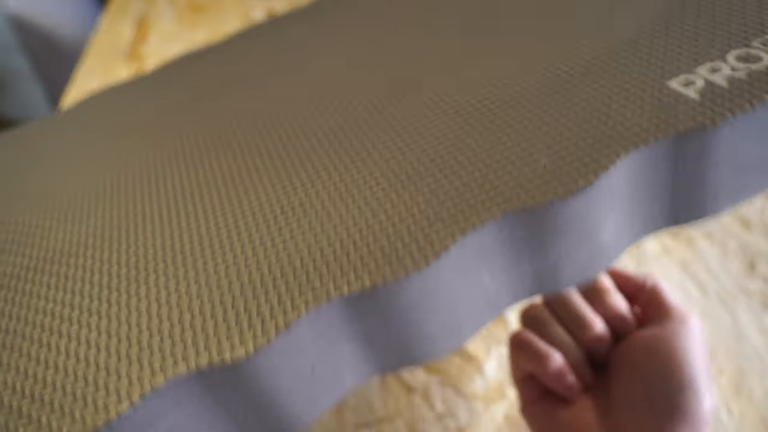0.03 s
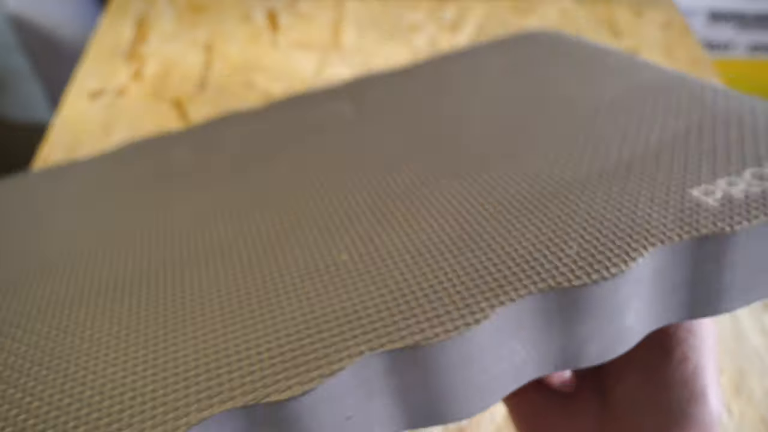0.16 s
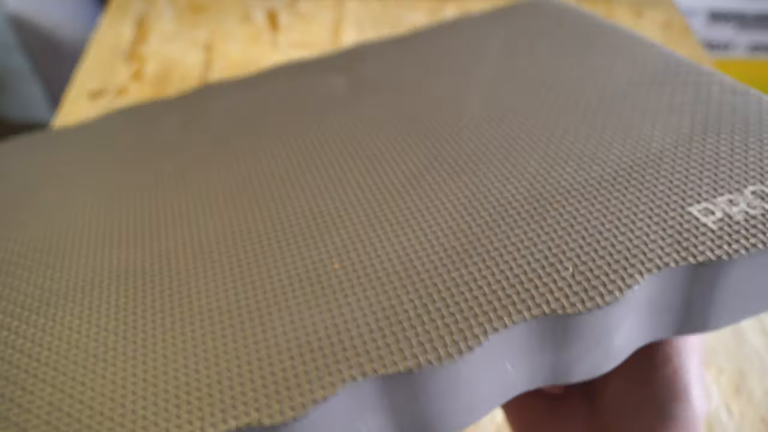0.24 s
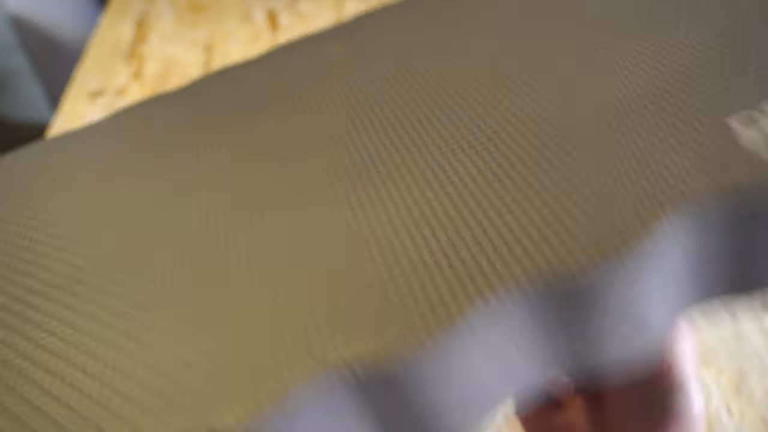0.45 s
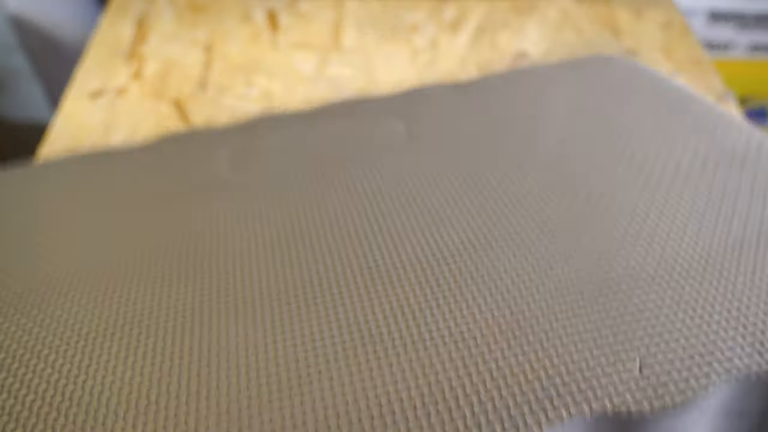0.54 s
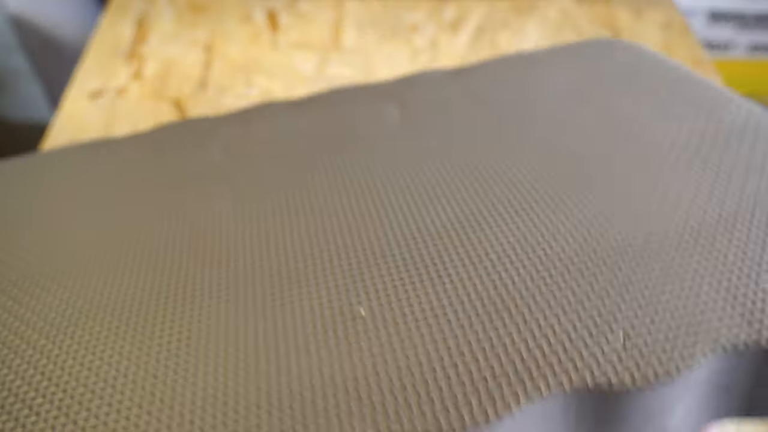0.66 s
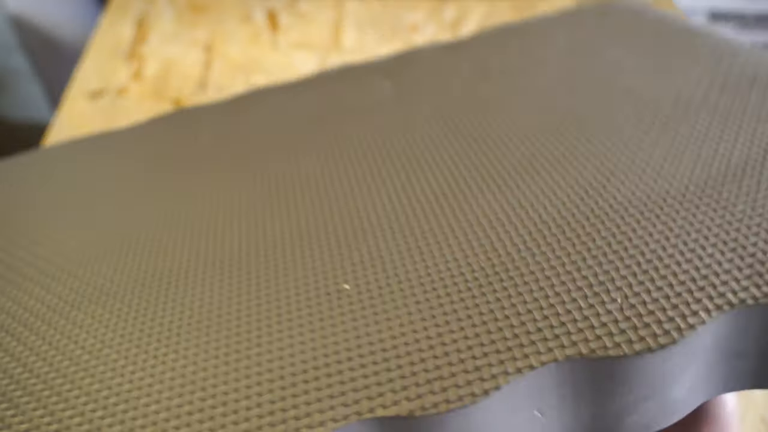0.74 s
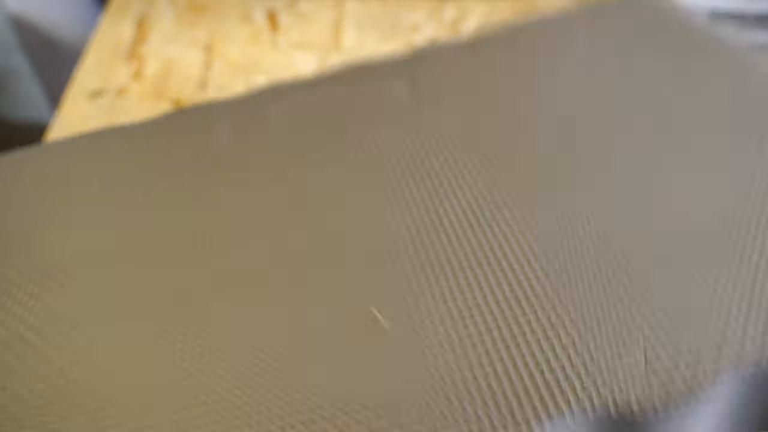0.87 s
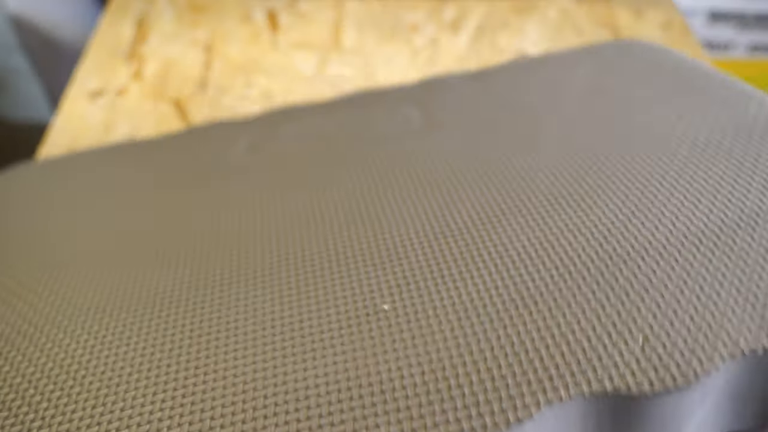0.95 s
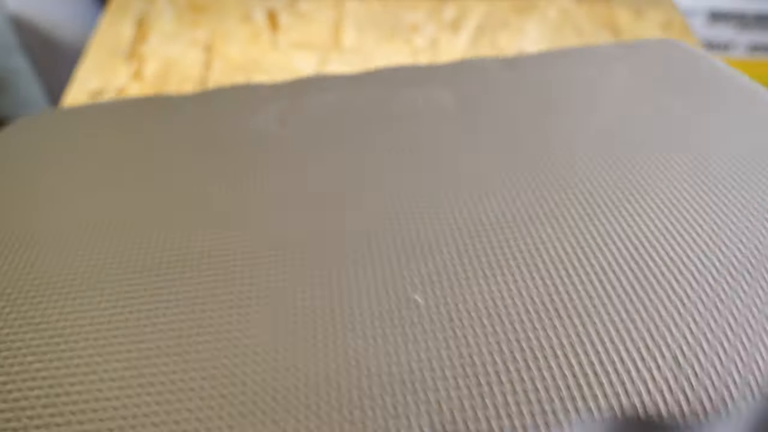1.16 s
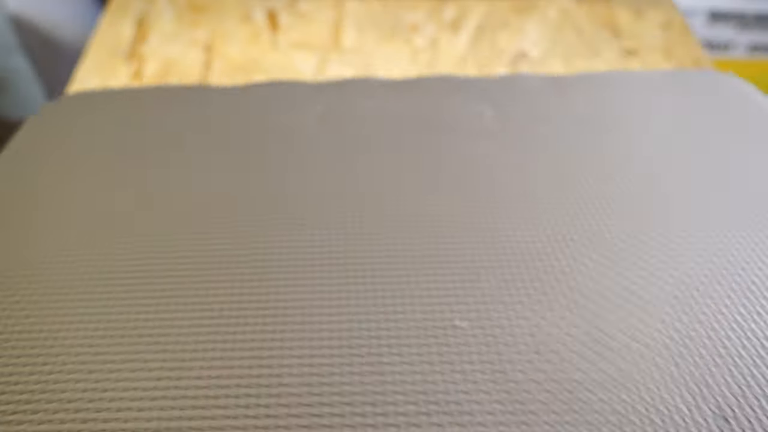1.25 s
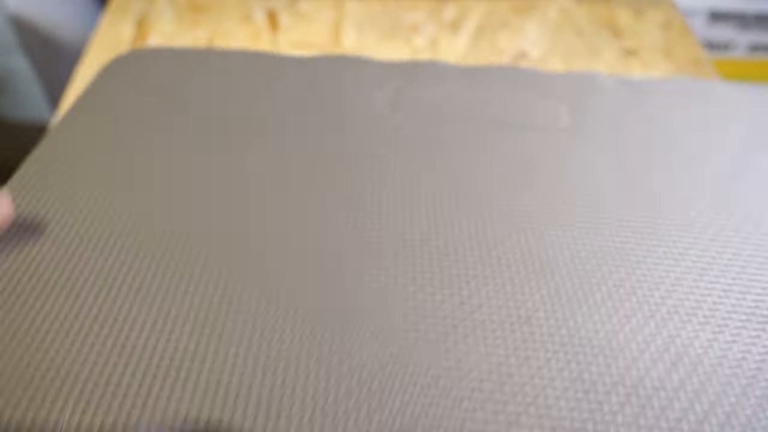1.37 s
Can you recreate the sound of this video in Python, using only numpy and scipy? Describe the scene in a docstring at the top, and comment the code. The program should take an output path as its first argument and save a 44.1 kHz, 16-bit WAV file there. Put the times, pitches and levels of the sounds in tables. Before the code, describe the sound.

Three low, evenly spaced thumps come from knuckles hitting a foam mat close by, followed by two brief, hissy strokes of skin on foam. The small room echoes slightly, and ventilation hums quietly underneath.

```python
"""A fist knocks three times from below on a thick foam pad, close to the microphone in a small room.
Each knock pushes out a puff of air, bends the pad with a low thump, makes it ring and ticks at the
knuckles. The skin scuffs the foam around each knock, then the hand slides over its ribs in two strokes.
The knocks echo briefly in the room, and a ventilation hum lies underneath."""
import sys
import numpy as np
from scipy import signal
from scipy.fft import rfft, irfft
from scipy.io import wavfile

SR = 44100
rng = np.random.default_rng(int(sys.argv[2]) if len(sys.argv) > 2 else 0)


def transcribe(u):
    """Save the signal u as a 16-bit wav file named by the first command-line argument.

    u: samples, shape (n,) or (channels, n), limited to [-1, 1]; the rate is SR.
    q: integer samples, one column per channel.
    """
    v = np.clip(np.atleast_2d(u).T, -1, 1)
    q = np.round(v * 32767).astype(np.int16)
    wavfile.write(sys.argv[1], SR, q)


N = 61739
T = np.arange(N) / SR

# The knocks. Each row: start in seconds, puff level in dB, puff length in seconds,
# then the levels of the thump, the hollow ring and the knuckle tick in dB.
KNOCKS = [(0.2205, -10, .0063, -10, -16.5, -13.3), (0.6265, -7.2, .0029, -14.7, -20, -17),
          (0.9915, -6.5, .0030, -15.8, -20, -25)]
# The tones of the pad's ring and of the tick. Each row: pitch in Hz, level in dB, seconds to fade 60 dB.
PAD_TONES = [(345, -7, .06), (490, -6, .065), (555, -3, .04), (675, -8, .06), (1020, -13, .016),
             (1222, -17, .06)]
TICK_TONES = [(1650, -16, .016), (1990, -6, .018), (2500, -6, .014), (2700, -.5, .012), (3350, -9, .012)]
# Skin rubbing on foam. Each row: start, rise time, hold time and time to fade 20 dB, all in seconds,
# level in dB, pan in dB (below zero is to the right), frequency in Hz above which the hiss gets duller.
RUBS = [(.150, .03, .035, .02, -50.5, 0, 14000), (.220, .001, .012, .02, -33.5, -2.5, 14000),
        (.232, .006, .026, .06, -41, 0, 9000), (.535, .02, .02, .06, -56, 0, 12000),
        (.626, .001, .008, .015, -37, -4, 10000), (.630, .004, .038, .085, -39, -3.5, 3500),
        (.651, .002, .002, .012, -38, -4, 8000), (.945, .006, .004, .035, -49, 1, 10000),
        (.991, .001, .007, .02, -30.5, -4.5, 4200), (1.011, .002, .002, .024, -27.5, -4, 1800),
        (1.012, .005, .022, .05, -38, -5, 9000), (1.096, .030, .070, .108, -35.2, -8, 15000),
        (1.294, .003, .012, .04, -36.8, -9, 21500), (1.315, .025, .03, .17, -42.7, -7.5, 20000)]
# Echoes from nearby surfaces. Each row: delay in seconds, level in dB.
ECHOES = [(.0068, -10), (.0278, -19), (.054, -25)]
# How long the room rings. Each row: frequency in Hz, seconds to fade 60 dB.
ROOM_FADE = [(100, .3), (500, .35), (3000, .3), (12000, .18)]
# The tone colour of the rubbing, the room and the moving air. Each row: frequency in Hz, level in dB.
RUB_COLOUR = [(300, -11), (1000, -4), (2800, 1), (4500, -.3), (7000, -3), (10000, -3), (13000, -4.8),
              (16000, -7.5)]
ROOM_COLOUR = [(50, -22), (150, -18), (300, -13), (550, 1), (1000, -4), (2000, -6.5), (4000, -7),
               (8000, -10), (16000, -14)]
AIR_COLOUR = [(20, -28), (35, -17), (55, -9), (100, -3.5), (150, -6), (205, -2.5), (270, -7), (370, -8),
              (560, -11.7), (1300, -12.2), (2200, -18.7), (4250, -31.5), (8000, -38.3), (16000, -46.5)]
# Their stereo width. Each row: frequency in Hz, how alike left and right are (1 means the same).
RUB_LIKENESS = [(500, .7), (3000, .3), (6000, .2), (15000, .15)]
ROOM_LIKENESS = [(100, .2), (300, .85), (550, .75), (1500, .35), (8000, .1)]
AIR_LIKENESS = [(100, .9), (400, .8), (1000, .45), (2500, .25), (10000, .1)]
# The tones of the ventilation hum. Each row: pitch in Hz, level in dB.
HUM_TONES = [(59.2, -55), (118.4, -58), (204.6, -53.5), (355.3, -54), (468.3, -58), (818.3, -64)]

PUFF_PAN_DB, TICK_PAN_DB, AIR_PAN_DB = -1.6, -3.5, -1.5
SECOND_KNUCKLE_S, SECOND_KNUCKLE_DB = .0062, -8   # another knuckle lands just after the first
CRACK_DB, CRACK_S, CRACK_HZ = -7.5, .0065, 3800   # skin meeting foam; its level is relative to the tick
RING_LAG_S, THUMP_LAG_S = .0003, .001
CATCHES_PER_S, CATCH_SPREAD_DB, CATCH_DB = 1200, 3.5, -7   # foam cells catching and letting go
PRESSURE_WAVER_DB, PRESSURE_WAVER_HZ = .8, 45   # the hand presses unevenly
ROOM_DELAY_S, ROOM_BUILD_S = .009, .016
AIR_DB, HUM_WAVER_DEPTH, HUM_WAVER_HZ = -39.8, .45, 6
RIGHT_LEAD_S = .000075   # the pad is nearer the right microphone


def knocks():
    """Each knock pushes and pulls the air once, makes the pad ring hollow and ticks at the knuckles."""
    out = np.zeros((2, N))
    for start, puff_db, puff_s, _, ring_db, tick_db in KNOCKS:
        age = T - start
        push = np.pi * np.clip(age / puff_s, 0, 1)
        puff = from_db(puff_db) * np.sin(2 * push) * np.sin(push)
        hollow = sum(from_db(ring_db + db) * ring(age - RING_LAG_S, hz, fade_s)
                     for hz, db, fade_s in PAD_TONES)
        out += pan(PUFF_PAN_DB) * (puff + hollow)
        out += pan(TICK_PAN_DB) * from_db(tick_db) * knuckles(age)
    return out


def knuckles(age, flesh_hz=3600):
    """Two knuckles tick and the skin cracks against the foam. Flesh softens the highs."""
    tick = np.zeros((2, N))
    for lag_s, knuckle_db in [(0, 0), (SECOND_KNUCKLE_S, SECOND_KNUCKLE_DB)]:
        for hz, db, fade_s in TICK_TONES:
            scatter_db = rng.normal(0, 1, (2, 1))
            tick -= from_db(knuckle_db + db + scatter_db) * ring(age - lag_s, hz, fade_s)
    burst = rng.standard_normal((2, N)) * (age > 0) * np.exp(-np.abs(age) / CRACK_S)
    crack = from_db(CRACK_DB) * soften(burst, CRACK_HZ)
    flesh = signal.butter(3, flesh_hz, fs=SR, output="sos")
    return signal.sosfilt(flesh, tick + crack)


def pad_thumps():
    """The whole pad bends and swings back after each knock, making a low thump."""
    return -sum(from_db(thump_db) * ring(T - start - THUMP_LAG_S, hz=73, fade_s=.07)
                for start, _, _, thump_db, _, _ in KNOCKS)


def rubs():
    """Sliding skin hisses and catches on tiny foam cells, swelling and fading with each stroke."""
    out = np.zeros((2, N))
    for start, rise, hold, fade, db, pan_db, edge_hz in RUBS:
        sizes = from_db(CATCH_SPREAD_DB * np.minimum(rng.exponential(1, N), 4))
        signs = rng.choice([-1, 1], N)
        catches = unit_level(sizes * signs * (rng.random(N) < CATCHES_PER_S / SR))
        friction = coloured(stereo_noise(RUB_LIKENESS) + from_db(CATCH_DB) * catches, RUB_COLOUR)
        swell = np.clip((T - start) / rise, 0, 1)
        dying = from_db(-20 * np.maximum(T - start - rise - hold, 0) / fade)
        pressure = from_db(db + PRESSURE_WAVER_DB * waver(PRESSURE_WAVER_HZ, N))
        out += pan(pan_db) * pressure * swell * dying * soften(friction, edge_hz)
    return out


def echoes(x):
    """Nearby surfaces send the sound back duller, with its wave upside down."""
    dull = soften(x, hz=4000)
    return -sum(from_db(db) * delayed(dull, delay_s) for delay_s, db in ECHOES)


def room(x):
    """Many reflections blur into a tail that builds up, then dies away at its own pace in each octave."""
    noise, tail = stereo_noise(ROOM_LIKENESS), 0
    edges_hz = np.geomspace(35, 17000, 10)
    build = np.clip((T - ROOM_DELAY_S) / ROOM_BUILD_S, 0, 1)
    for low, high in zip(edges_hz, edges_hz[1:]):
        hz = np.sqrt(low * high)
        shape = build * from_db(-60 * T / at_hz(ROOM_FADE, hz))
        band = signal.sosfilt(signal.butter(2, [low, high], "band", fs=SR, output="sos"), noise)
        tail += from_db(at_hz(ROOM_COLOUR, hz)) * band * shape / np.sqrt(np.sum(shape ** 2))
    return signal.fftconvolve(x, tail, axes=1)[:, :N]


def ventilation():
    """A steady rush of air with a few wavering hum tones."""
    hum = 0
    for hz, db in HUM_TONES:
        swell, drift = HUM_WAVER_DEPTH * waver(HUM_WAVER_HZ, (2, N))
        phase = 2 * np.pi * (hz * T + rng.random())
        hum += from_db(db) * unit_level((1 + swell) * np.sin(phase) + drift * np.cos(phase))
    air = from_db(AIR_DB) * coloured(stereo_noise(AIR_LIKENESS), AIR_COLOUR)
    return pan(AIR_PAN_DB) * (air + hum)


def from_db(db):
    """Turn decibels into a number to multiply by."""
    return 10 ** (np.asarray(db) / 20)


def unit_level(x):
    """Scale a signal so its average level (root mean square) is 1."""
    return x / np.sqrt(np.mean(x ** 2) + 1e-20)


def at_hz(table, hz):
    """Read between a table's rows, giving every octave equal space."""
    frequencies, values = np.transpose(table)
    return np.interp(np.log(np.maximum(hz, 1)), np.log(frequencies), values)


def pan(db):
    """Left and right gains, with the left louder by this many dB."""
    return unit_level(from_db(np.array([[db], [-db]]) / 2))


def soften(x, hz):
    """Gently turn down the highs above this frequency."""
    return signal.sosfilt(signal.butter(1, hz, fs=SR, output="sos"), x)


def waver(hz, shape):
    """A smooth random wobble, mostly slower than this rate."""
    return unit_level(soften(soften(rng.standard_normal(shape), hz), hz))


def coloured(x, colour):
    """Give a steady sound a tone colour and a level of 1."""
    gains = from_db(at_hz(colour, np.fft.rfftfreq(N, 1 / SR)))
    return unit_level(irfft(rfft(x) * gains, N))


def stereo_noise(likeness):
    """White noise whose left and right sides are as alike as the table says."""
    shared, opposed = rfft(rng.standard_normal((2, N)))
    alike = at_hz(likeness, np.fft.rfftfreq(N, 1 / SR))
    return unit_level(irfft(np.sqrt(1 + alike) * shared + np.sqrt(1 - alike) * opposed * [[1], [-1]], N))


def ring(age, hz, fade_s):
    """A tone that is silent until struck, then fades 60 dB in fade_s seconds."""
    t = np.maximum(age, 0)
    return np.sin(2 * np.pi * hz * t) * from_db(-60 * t / fade_s)


def delayed(x, seconds):
    """The same sound, a little later."""
    hz = np.fft.rfftfreq(2 * N, 1 / SR)
    return irfft(rfft(x, 2 * N) * np.exp(-2j * np.pi * hz * seconds), 2 * N)[..., :N]


def scene():
    """Mix the knocks, their echoes and room tail, the rubbing hand and the ventilation."""
    blows, thumps = knocks(), pad_thumps()
    left, right = blows + thumps + echoes(blows) + room(blows + thumps) + rubs()
    return np.array([delayed(left, RIGHT_LEAD_S), right]) + ventilation()


def record(dry):
    """Turn down the deepest bass, below 32 Hz, and cut the highs steeply above 15800 Hz."""
    bass_cut = signal.butter(2, 32, "high", fs=SR, output="sos")
    treble_cut = signal.ellip(10, .1, 80, 15800, fs=SR, output="sos")
    return signal.sosfilt(treble_cut, signal.sosfilt(bass_cut, dry))


dry = scene()
out = record(dry)
transcribe(out)
```